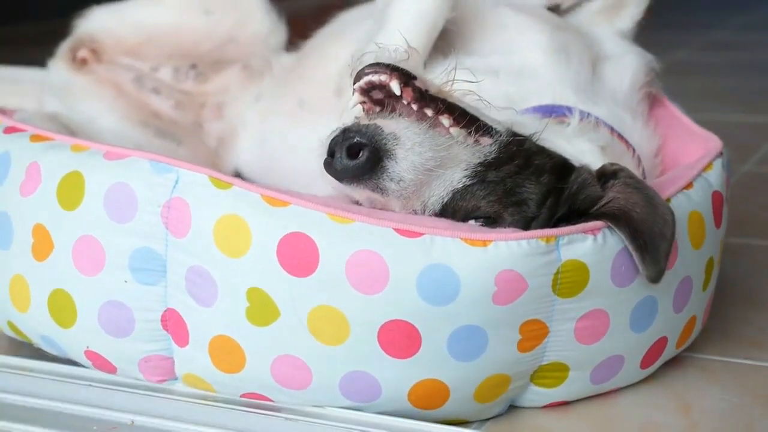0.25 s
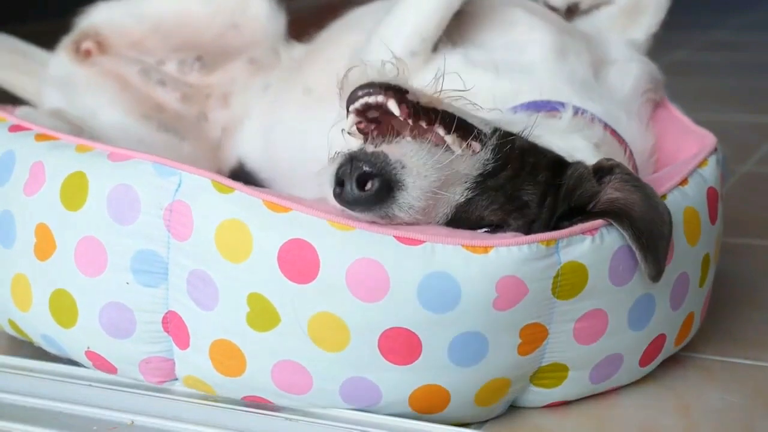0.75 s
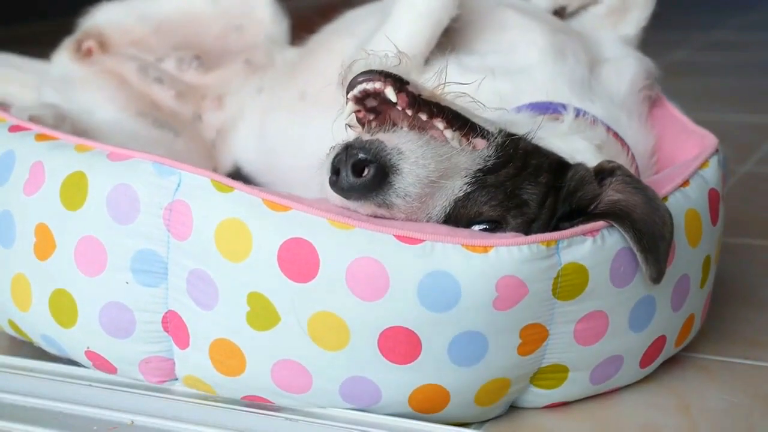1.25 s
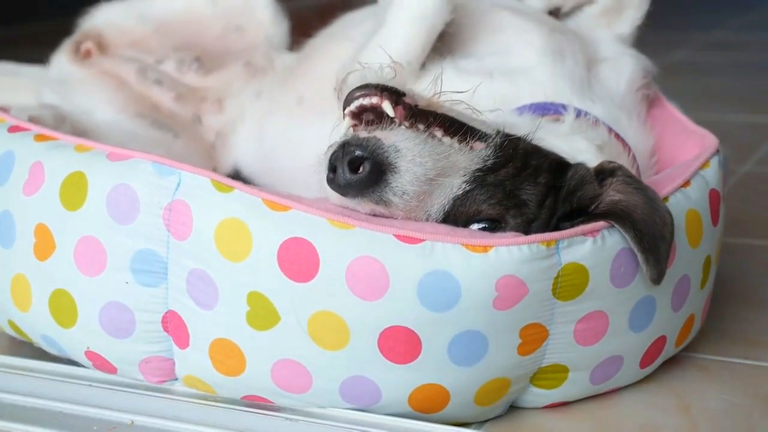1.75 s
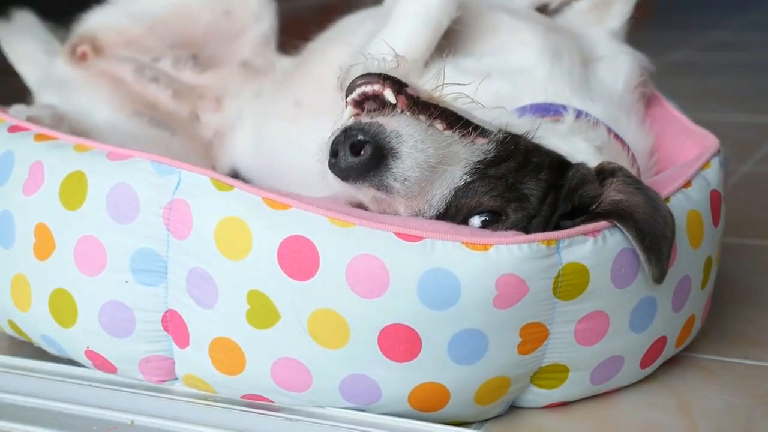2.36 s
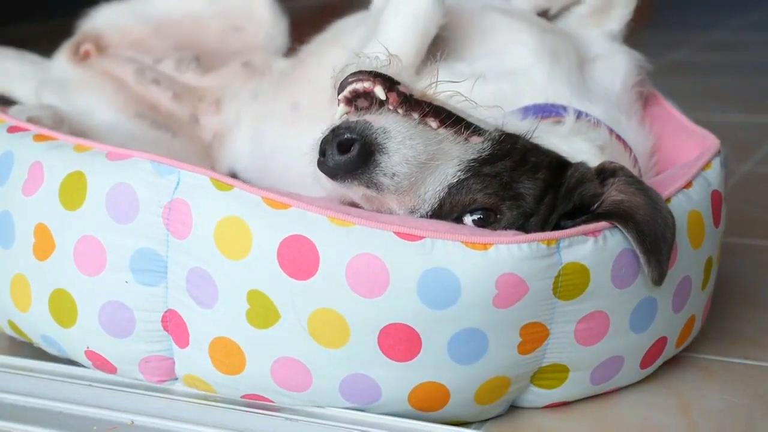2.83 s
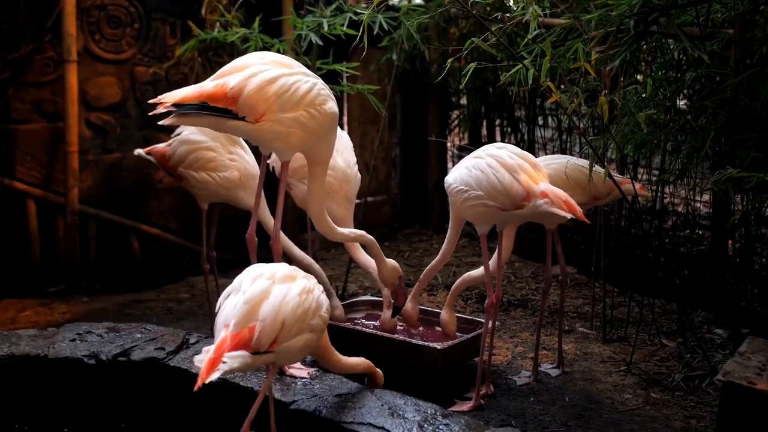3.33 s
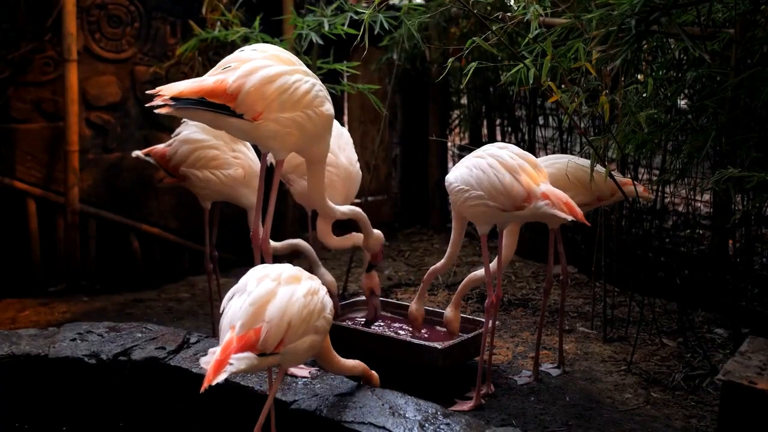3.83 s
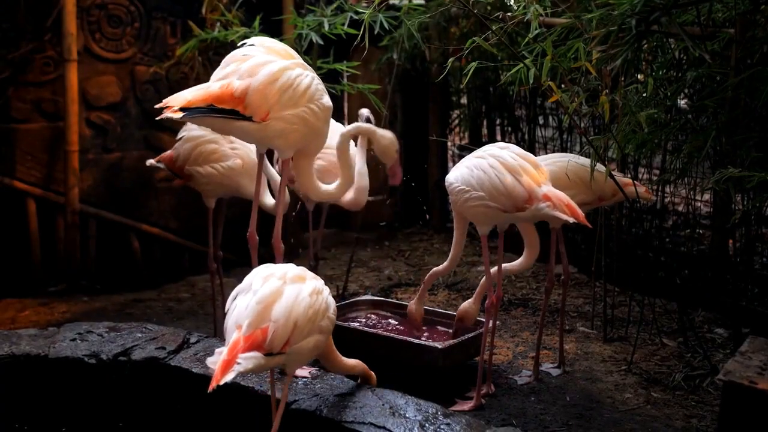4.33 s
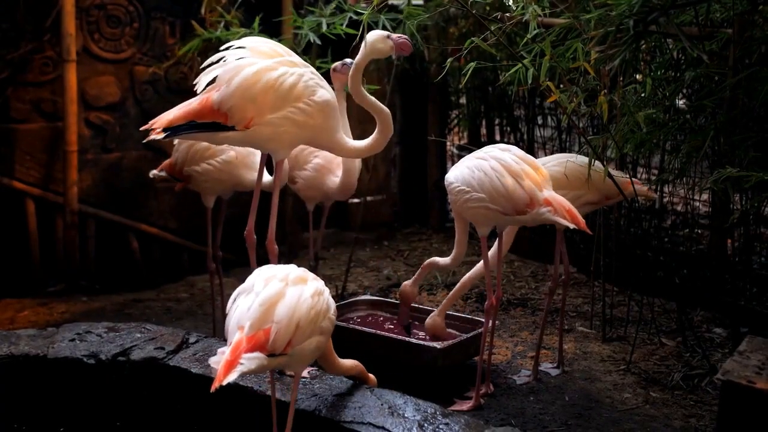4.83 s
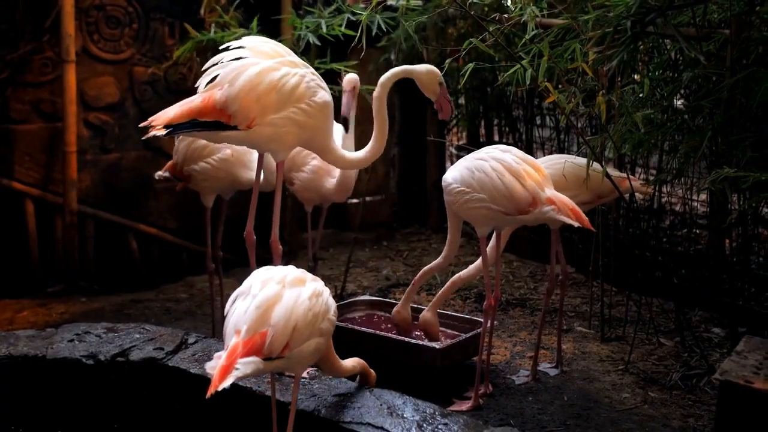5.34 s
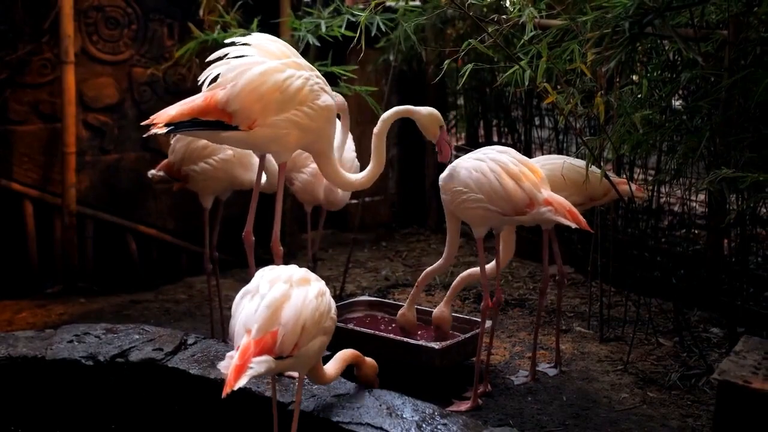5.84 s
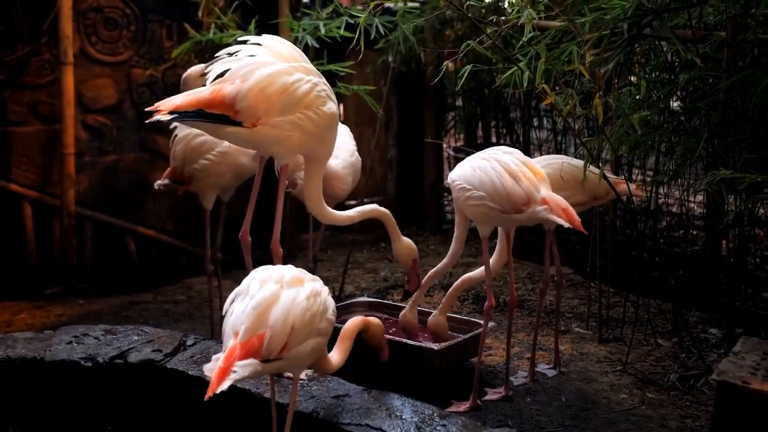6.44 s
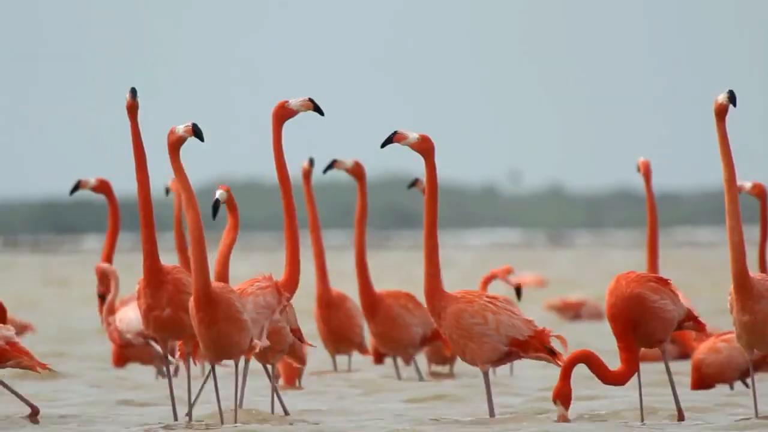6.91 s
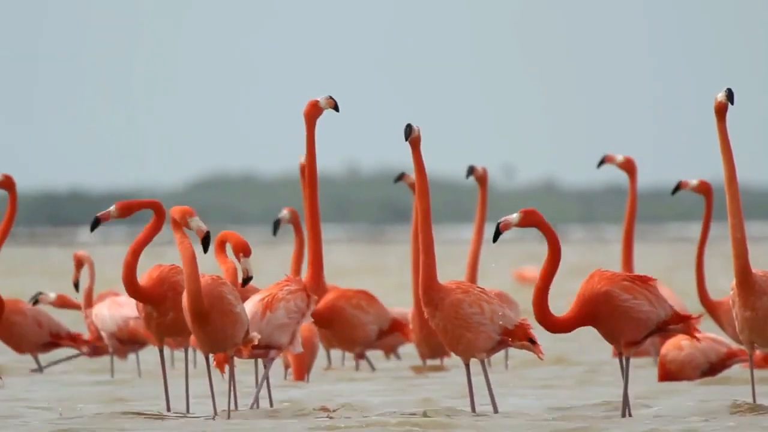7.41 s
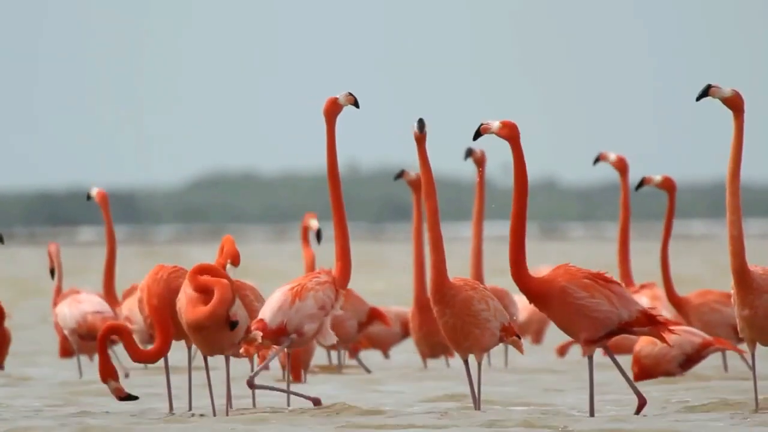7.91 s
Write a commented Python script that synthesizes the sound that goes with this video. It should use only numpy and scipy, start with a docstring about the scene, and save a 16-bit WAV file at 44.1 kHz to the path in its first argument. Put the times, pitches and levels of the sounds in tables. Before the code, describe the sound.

Close stereo pickup of three scenes in a row. First a dog indoors: one falling whine, a second that starts high and drops quickly, faint nose whistles, then three harsh barks with short room reflections. Next, flamingos at a feeding trough: fluttery nasal honks, pulsed grunts, dull knocks, broad background noise and a water slap. Finally open water, smooth wind, coarse rattling calls, a clear high note and soft honks.

```python
"""In a small room a dog whines twice, its voice catching now and then, and barks three times. The whines are
nearly pure tones, the barks unsteady harmonics with torn noise. Then, in an enclosure, flamingos honk (fluttering
harmonics), grunt (pulsed resonances) and knock their bills over a wash and far chatter of patchy noise, ending in
a short noise splash. Last, on an open lagoon, a flock rattles and honks, with one clear note, in a light breeze."""
import sys
import numpy as np
from scipy import signal
from scipy.fft import rfft, irfft, next_fast_len
from scipy.io import wavfile

SR = 44100
rng = np.random.default_rng(int(sys.argv[2]) if len(sys.argv) > 2 else 0)


def persist_wave(psi):
    """Save psi, clipped to +-1, as 16-bit WAV."""
    counts = np.round(np.clip(psi, -1, 1) * 32767).astype(np.int16)
    wavfile.write(sys.argv[1], SR, np.atleast_2d(counts).T)


N = 360297
T = np.arange(N) / SR
CUTOFF_HZ = 15900  # no harmonics above this


def from_db(db):
    """Decibels to gain."""
    return 10 ** (np.asarray(db) / 20)


def rms_one(x):
    """Scale to rms 1."""
    return x / np.sqrt(np.mean(x ** 2) + 1e-20)


def at_hz(points, hz):
    """Gain of a spectrum, joined on a log-frequency axis."""
    point_hz, db = np.transpose(points)
    return from_db(np.interp(np.log(np.maximum(hz, 1)), np.log(point_hz), db))


def span(start, end):
    """Sample times between two moments."""
    return np.arange(int(start * SR), int(end * SR)) / SR


def follow(rows):
    """Times, a 2.9 ms fade at each edge, and the columns of a curve."""
    s, *columns = np.transpose(rows)
    t = span(max(s[0], 0), s[-1])
    fade = np.clip(np.minimum(t - t[0], t[-1] - t) / 0.0029, 0, 1)
    return [t, fade] + [np.interp(t, s, column) for column in columns]


def add(out, t, x, pan_db=0):
    """Mix a sound in at its time and side; positive pan is to the left."""
    i = int(round(t[0] * SR))
    sides = from_db([[pan_db / 2], [-pan_db / 2]])
    out[:, i:i + len(t)] += (x * sides)[:, :N - i]


def white(t):
    """Fresh white noise for these times."""
    return np.random.default_rng(rng.integers(2 ** 31)).standard_normal(len(t))


def colour(x, spectrum):
    """Shape a sound by a spectrum; rms 1."""
    size = next_fast_len(len(x) + 1024)
    gains = at_hz(spectrum, np.fft.rfftfreq(size, 1 / SR))
    return rms_one(irfft(rfft(x, size) * gains, size)[:len(x)])


def wobble(t, hz):
    """Random unsteadiness up to a given rate; rms 1."""
    return rms_one(signal.sosfilt(signal.butter(2, hz, fs=SR, output="sos"), white(t)))


def turns(hz):
    """Running phase, in radians, of a frequency."""
    return 2 * np.pi * np.cumsum(hz) / SR


def shaky(t, hz, spread):
    """A sine whose pitch shakes at random, like an unsteady resonance; rms about 1."""
    return np.sqrt(2) * np.sin(turns(hz * (1 + spread * wobble(t, 450))))


def harmonics(pitch, throat, order=1, uneven_db=0):
    """Harmonics from a given order up, weighted by the throat, each wavering on its own; rms about 1."""
    k = np.arange(order, 26)[:, None]
    waver = np.array([wobble(pitch, 18) for _ in k])
    gains = at_hz(throat, k * pitch) * (k * pitch < CUTOFF_HZ) * from_db(uneven_db * waver)
    return np.sum(gains * np.sin(k * turns(pitch)), 0) / np.sqrt(np.sum(gains ** 2, 0) / 2)


def swell(t, rise, fall):
    """Rounded envelope; rise and fall are shares of the call."""
    u = np.linspace(0, 1, len(t))
    return np.sin(np.pi / 2 * np.clip(np.minimum(u / rise, (1 - u) / fall), 0, 1))


def mid_side(mid, side, width):
    """Left and right from a shared part and a part of opposite sign at each ear."""
    return mid + width * side * np.array([[1], [-1]])


def echoes(x, t60, wet_db, width, tone):
    """Dense reflections that die away by 60 dB in t60 seconds, partly different at each ear."""
    t = span(0, .6)
    decay = from_db(-60 * t / t60) * (t > .003)
    mid, side = [colour(white(t), tone) * decay for _ in range(2)]
    tail = mid_side(mid, side, width)
    tail /= np.sqrt(np.sum(tail ** 2) / 2)
    return x + from_db(wet_db) * signal.fftconvolve(x, tail, axes=1)[:, :N]


def rush(rows, spectrum, width, grain_db, split_hz=2500):
    """Grainy stereo noise whose low and high parts swell separately."""
    out = np.zeros((2, N))
    t, fade, low_db, high_db = follow(rows)
    grain = from_db(grain_db * wobble(t, 250))
    mid, side = [colour(white(t) * grain, spectrum) for _ in range(2)]
    noise = mid_side(mid, side, width)
    for kind, db in (("low", low_db), ("high", high_db)):
        band = signal.sosfilt(signal.butter(3, split_hz, kind, fs=SR, output="sos"), noise)
        add(out, t, fade * from_db(db) * rms_one(band))
    return out


# broad course of each whine, before its catches: time_s, pitch_hz, fundamental_db, overtones_db
WHINE_COURSES = [
    [(0,485,-20.5,-35.5),(.06,476,-22,-66),(.108,478,-18.5,-42),(.155,531,-8.5,-25.5),(.2,527.7,-11,-31),(.285,488,-11,-39.5),(.39,485.4,-16,-32),(.574,455,-28.5,-56),(.6,446,-46,-58)],
    [(.745,1104,-42,-64),(.762,1083,-29.5,-40.5),(.786,1065,-27,-42),(.792,1004,-32,-53),(.804,810,-14.5,-40),(.865,620,-14,-44),(1.1,607,-17.5,-53),(1.19,579,-21.5,-47.5),(1.4,521.6,-24,-50),(1.595,511,-28,-51),(1.64,497,-47,-71)],
]
# throat that weights the overtones of each whine: frequency_hz, relative_db
WHINE_THROATS = [
    [(950,13),(1550,-5),(2600,-21.5),(3200,-41.5),(8000,-52.5)],
    [(1200,7.5),(1800,-5),(2300,4.5),(3300,-27.5),(4600,-14),(11000,-38)],
]
# air through the nose: frequency_hz, relative_db (per Hz)
WHINE_AIR = [(100,-27),(900,4),(2300,-2.5),(3300,-14.5),(5400,-4.5),(8000,-17.5)]
# catches, where the throat tightens: time_s, pitch_lift_hz, fundamental_choke_db
CATCHES = [(.042,37,18),(.135,15.8,9),(0.238,8.2,15.5),(.332,27,9.5),(1.027,120,8.5),(1.285,57,-1.5),(1.471,54,-1)]
CATCH_RISE_S, CATCH_SETTLE_S, CHOKE_S = .022, .04, .025


def whines():
    """Nearly pure tones, overtones veiled by air; each catch lifts the pitch and most choke the tone."""
    out = np.zeros((2, N))
    air_levels_db = (-30, -9)  # relative to the overtones
    for rows, throat, air_db in zip(WHINE_COURSES, WHINE_THROATS, air_levels_db):
        t, fade, pitch, tone_db, over_db = follow(rows)
        for s, lift_hz, choke_db in CATCHES:
            settling = np.where(t < s, CATCH_RISE_S, CATCH_SETTLE_S)
            pitch = pitch + lift_hz * np.exp(-np.abs(t - s) / settling)
            tone_db = tone_db - choke_db * np.exp(-((t - s) / CHOKE_S) ** 2)
        pitch = pitch * (1 + 0.0066 * wobble(t, 70))
        tone = np.sqrt(2) * from_db(tone_db + 1.2 * wobble(t, 25)) * np.sin(turns(pitch))
        air = from_db(air_db) * colour(white(t), WHINE_AIR)
        overtones = harmonics(pitch, throat, order=2, uneven_db=3.5) + air
        add(out, t, fade * (tone + from_db(over_db) * overtones))
    return out


# room air: time_s, low_db, high_db
ROOM_AIR = [(0.0, -45.5, -72.5), (1.634, -50, -64.5), (1.87, -52, -69)]
# its colour: frequency_hz, relative_db (per Hz)
ROOM_AIR_COLOUR = [(30,-34),(100,-11),(190,0.5),(320,-6.5),(800,-8),(2000,-31),(6000,-26),(15000,-28.5)]


def room_air():
    """The quiet bed of the small room: noise, nearly the same at both ears."""
    return rush(ROOM_AIR, ROOM_AIR_COLOUR, width=0.15, grain_db=2.0)


# thin nasal whistles: start_s, end_s, mean_pitch_hz, level_db, glide_share, breathiness_share
NOSE_WHISTLES = [(0.043,0.137,4200,-51,0.2,.012),(0.741,0.798,5350,-37,-0.06,.008),(0.814,0.848,5000,-44.5,-0.14,.01),(1.03,1.125,5150,-56,-.08,.03),(1.37,1.6,4200,-65,-0.03,.004),(1.598,1.625,4240,-56,0,.02)]


def nose_whistles():
    """The nose whistles: a thin, slightly shaky sine gliding fast at first, then settling."""
    out = np.zeros((2, N))
    for start, end, hz, db, glide, breathy in NOSE_WHISTLES:
        t = span(start, end)
        bend = 1 / 4 - np.linspace(1, 0, len(t)) ** 3
        whistle = shaky(t, hz * (1 + glide * bend), breathy)
        add(out, t, from_db(db) * swell(t, 0.57, 0.3) * whistle)
    return out


# barks: start_s, length_s, full_effort_pitch_hz, voice_db, rasp_db, voice_break_s,
# mouth_ring_from_hz, mouth_ring_to_hz, ring_db
BARKS = [(1.983,.13,631.6,-12,-14,2.032,1900,2395,-23.5),(2.359,0.13,643,-11.5,-14,2.428,1755,2850,-20.5),(2.596,.142,615,-11,-14,2.703,1900,1500,-23)]
# throat that weights the voice: frequency_hz, relative_db
BARK_VOICE = [(300,-11.5),(500,-2),(680,11),(1150,-17.5),(1800,-9.5),(2600,-19.5),(4000,-55.5)]
# throat that shapes the rasp: frequency_hz, relative_db
BARK_RASP = [(600,-39.5),(880,-14.5),(1140,3),(1550,-17),(1750,-7),(2200,-15.5),(2750,-11.5),(3500,-25.5),(4600,-33),(6600,-30),(8500,-33),(14000,-58)]
# noise from the chest: frequency_hz, relative_db (per Hz)
BARK_CHEST = [(30,-28.5),(100,-19),(380,-23),(500,2.5),(800,6),(1100,-18.5),(2000,-55)]
BARK_LEAD_S, BARK_LEAD_DB = .02, 13  # the voice creeps in to this far below full effort
BARK_ATTACK_S, BARK_ATTACK_DB = .013, 30  # then bursts open; the dB is the whole climb
BARK_RELEASE_S, BARK_RELEASE_DB = .026, 20
BARK_SLACK_PER_DB = 0.02  # share of pitch lost per dB below full effort
BARK_SAG_HZ_PER_S = 453
JAW_DB = 10.5  # the rasp and ring are this much weaker at both ends than with the jaw wide open
BARK_BREAK_S, BARK_BREAK_DB = .0045, 5  # the voice gives way for a moment
RING_SPREAD = .04  # unsteadiness of the mouth ring and the whistle past the teeth
TEETH_HZ, TEETH_DB = 6200, -38
TEAR_HZ, TEAR_DEPTH = 130, .55  # the rasp tears in uneven pulses
BARK_LAG_S = .00016  # the barks reach the left microphone first


def barks():
    """Chaotic folds: pitch follows effort, turbulence passes each cycle, and a mouth ring glides."""
    out = np.zeros((2, N))
    for start, length, top_hz, voice_db, rasp_db, break_s, from_hz, to_hz, ring_db in BARKS:
        end = start + length
        burst = start + BARK_LEAD_S
        t, fade, effort_db = follow([
            (start, -BARK_ATTACK_DB), (burst, -BARK_LEAD_DB), (burst + BARK_ATTACK_S, 0),
            (end - BARK_RELEASE_S, 0), (end, -BARK_RELEASE_DB)])
        effort_db = effort_db + 0.7 * wobble(t, 45)
        jaw_db = -JAW_DB * np.linspace(-1, 1, len(t)) ** 2
        jaw_db = jaw_db + np.minimum(effort_db + BARK_LEAD_DB, 0) / 2

        pitch = top_hz * np.exp(BARK_SLACK_PER_DB * effort_db) - BARK_SAG_HZ_PER_S * (t - t.mean())
        pitch = pitch * (1 + 0.055 * wobble(t, 200))
        voice = harmonics(pitch, BARK_VOICE, uneven_db=4) * (1 + 0.12 * wobble(t, 130))
        voice = voice + .5 * colour(white(t), BARK_CHEST)
        voice *= from_db(-BARK_BREAK_DB * np.exp(-((t - break_s) / BARK_BREAK_S) ** 2))

        bursts = (1 + .8 * np.cos(turns(pitch))) * from_db(2.5 * wobble(t, 150))
        turbulence = colour(white(t) * bursts, BARK_RASP)
        # when pushed, the folds slip to half their rate
        growl = harmonics(pitch / 2, BARK_RASP, order=3, uneven_db=12.0)
        rasp = rms_one(turbulence + 0.61 * growl * from_db(effort_db / 2))
        tearing = 1 + TEAR_DEPTH * shaky(t, TEAR_HZ, .3) / np.sqrt(2)
        rasp = rms_one(rasp * tearing)

        ring_hz = np.linspace(from_hz, to_hz, len(t))
        ring = from_db(ring_db + 3.75 * wobble(t, 60)) * shaky(t, ring_hz, RING_SPREAD)
        teeth_hz = TEETH_HZ * (1 + .06 * wobble(t, 30))
        ring += from_db(TEETH_DB + 4.6 * wobble(t, 60)) * shaky(t, teeth_hz, RING_SPREAD)
        mouth = from_db(jaw_db) * (from_db(rasp_db) * rasp + ring)
        add(out, t, fade * from_db(effort_db) * (from_db(voice_db) * voice + mouth))
    tone = [(100, -11), (500, -3.0), (2800, 1.0), (8000, 0.5)]
    left, right = echoes(out, t60=0.19, wet_db=-3.5, width=1.0, tone=tone)
    return np.array([left, np.interp(T - BARK_LAG_S, T, right)])


def crowd(x, patchy_db, count=9):
    """Many far voices overlap: each stretch of the middle range swells and sinks on its own."""
    size = next_fast_len(N)
    centres, hz = np.log(np.geomspace(400, 6000, count)), np.fft.rfftfreq(size, 1 / SR)
    spectrum, out = rfft(x, size), 0
    for own in np.eye(count):
        band = irfft(spectrum * np.interp(np.log(hz + 1), centres, own), size)[:, :N]
        is_middle = 1 - own[0] - own[-1]  # the lowest and highest stretches stay steady
        out = out + band * from_db(patchy_db * wobble(T, 14) * is_middle)
    return out


# wash of the enclosure, before its panning and patchiness: time_s, low_db, high_db
WASH = [(3.215,-37.5,-42.5),(3.78,-38.5,-40.5),(3.82,-33,-35),(4.3,-29,-33),(4.4,-32,-37),(4.75,-36,-37),(5.05,-30.5,-33.5),(5.35,-40,-46.5),(6.28,-42.5,-48),(6.5,-36.5,-41.5),(6.95,-34,-40.5)]
# its colour: frequency_hz, relative_db (per Hz)
WASH_COLOUR = [(25,-30),(59,-5),(117,-14.5),(290,0),(1610,0.5),(5880,-21.5),(11000,-23.5),(16000,-34.5)]
# its drift between the sides: time_s, left_minus_right_db
WASH_PAN = [(3.8,-4.5),(4.25,-1.5),(4.6,-1),(5.2,4)]


def enclosure_wash():
    """Wash and far chatter: broad noise drifting from right to left, patchy in the middle range."""
    side_db = np.interp(T, *np.transpose(WASH_PAN))
    wash = rush(WASH, WASH_COLOUR, width=0.42, grain_db=2.0)
    return crowd(wash * from_db([side_db / 2, -side_db / 2]), patchy_db=3.0)


# honks: start_s, length_s, level_db, rasp (0-1), kind (0-3)
HONKS = [(3.216,.08,-21,0.5,0),(3.303,0.11,-22.5,0.58,1),(4.372,0.078,-23.5,0.22,0),(4.475,0.095,-21.5,0.48,1),
         (5.313,0.077,-26.5,0.45,2),(5.541,0.08,-28.5,0.4,2),(5.583,0.082,-22,0.2,0),(5.672,0.115,-19,0.55,1),(5.786,0.098,-30,0,2),
         (6.06,0.094,-24.5,0.2,2),(6.34,0.1,-26.5,0.13,2),(6.633,0.1,-25.5,0.15,2),(7.723,0.062,-26.5,0.2,3),(7.828,0.13,-20.5,0.1,3)]
# kinds (loud bird's high note, its low note, soft bird, lagoon bird):
# top_pitch_hz, final_drop_share, pan_db (positive left), throat (rounded to 0-3)
HONK_KINDS = [(924,0.125,4,0.5),(730,0.09,3.5,3),(814.6,0.0465,-3,1),(622,0.055,-4,2)]
# throats (loud bird's high note, soft bird, lagoon bird, loud bird's low note): frequency_hz, relative_db
HONK_THROATS = [
    [(400,-43),(900,5),(1850,-3),(2770,-10.5),(6450,-14.5),(8800,-22),(10500,-19),(15000,-30)],
    [(810,3.5),(1620,-3.5),(2430,3.5),(4060,-13),(5600,-12),(6500,-25),(8900,-9),(9800,-16),(14000,-17)],
    [(300,-3),(620,1.5),(1230,10),(2450,-8),(3050,-4.5),(4400,-14.5),(12000,-35)],
    [(400,-35),(730,1.5),(2150,-1.5),(2900,-9),(5100,-13),(5900,-21),(10500,-18),(15000,-29)],
]
BILL_HZ, BILL_SHUT_DB = 3500, 11  # treble is weaker at both ends of a honk, with the bill half shut


def honks():
    """Pitch arches and drops; the syrinx flutters, loosest at both ends, with hoarse air on every cycle."""
    out = np.zeros((2, N))
    for start, length, db, rasp, kind in HONKS:
        top_hz, drop, pan_db, bird = HONK_KINDS[int(round(kind))]
        t, throat = span(start, start + length), HONK_THROATS[int(round(bird))]
        away = np.linspace(-1, 1, len(t))  # 0 at the middle of the call
        loose = np.clip(rasp * (.55 + 1.2 * away ** 2), 0, 1)
        arch = 1 - 0.031 * away ** 2 - drop * np.maximum(away, 0) ** 2
        pitch = top_hz * (arch + .03 * loose * wobble(t, 500))
        flutter = 1 + .7 * loose * np.cos(turns(140 * (1 + 0.16 * wobble(t, 37))))

        air_colour = [(100, -40), (700, -12)] + [p for p in throat if p[0] > top_hz * 1.5]
        air = colour(white(t) * (1 + np.cos(turns(pitch))), air_colour)
        voice = harmonics(pitch, throat, uneven_db=2.5) + air * (.12 + 1.5 * loose)
        dull = signal.sosfilt(signal.butter(1, BILL_HZ, fs=SR, output="sos"), voice)
        voice = dull + (voice - dull) * from_db(-BILL_SHUT_DB * away ** 2)
        add(out, t, from_db(db) * rms_one(voice * flutter) * swell(t, 0.43, 0.39), pan_db)
    return out


# hiss let out by grunts, also used for the knocks: frequency_hz, relative_db (per Hz)
GRUNT_HISS = [(200,-18),(800,5),(3000,3),(5000,-6),(9000,-17.5),(15000,-30)]
PULSE_RISE_S = .0015
GRUNT_QUICKEN, GRUNT_BLUR = .22, .7  # share of rate gained; how far the gaps fill by the end
GRUNT_SAG, GRUNT_GROW_DB = 0.1194, 1.5  # share by which the resonances sink; crescendo


def grunt(t, per_s, first_hz, second_hz, second_db, hiss_db, spread):
    """Pulses, quickening and blurring, ring two sinking throat resonances and let out hiss."""
    progress = np.linspace(0, 1, len(t))
    rate = per_s * (1 + GRUNT_QUICKEN * (progress - .5) + 0.038 * wobble(t, 60))
    cycle_share = turns(rate) / (2 * np.pi) % 1
    age = cycle_share / rate / PULSE_RISE_S  # 1 at the peak of a pulse
    pulses = age ** 2 * np.exp(2 * (1 - age)) * from_db(1.5 * wobble(t, 120))
    pulses = pulses + GRUNT_BLUR * progress ** 2
    sag = 1 - GRUNT_SAG * (progress - .5)
    first = shaky(t, first_hz * sag, spread)
    second = from_db(second_db + 3 * wobble(t, 400)) * shaky(t, second_hz * sag, spread)
    # the hiss lingers between pulses
    hiss = from_db(hiss_db) * colour(white(t), GRUNT_HISS) * np.sqrt(pulses)
    call = (first + second) * pulses + hiss
    return rms_one(call * from_db(GRUNT_GROW_DB * progress)) * swell(t, 0.0085, 0.3)


# grunts: start_s, length_s, level_db, kind (0-7)
GRUNTS = [(3.375,.045,-25,0),(3.516,0.12,-32,5),(3.803,0.14,-34,6),(4.21,.07,-32,0),(4.284,0.058,-32.5,2),(4.534,0.062,-26,0),(4.641,0.051,-31,0),
          (4.875,.09,-34.5,1),(4.98,0.074,-35,0),(5.304,0.12,-29,1),(5.589,0.018,-27.5,0),(5.735,.062,-22,0),
          (6.045,0.078,-28.5,1),(6.329,0.028,-33.5,6),(6.411,0.13,-32.5,7),(6.683,0.063,-30.5,7),(6.754,0.07,-33.5,7),
          (7.149,0.061,-28.5,3),(7.267,0.13,-20.5,3),(7.398,0.063,-25.5,3),(7.467,0.085,-19.5,3),(7.718,0.025,-21.5,5),(7.786,0.078,-22,4),(7.925,.11,-20,4),(8.041,0.064,-32.5,4),(8.105,0.088,-22.5,4)]
# kinds (deep, nasal, hissing, two lagoon rattles, a cluck, a squeak, a rasp): pulses_per_s,
# first_resonance_hz, second_resonance_hz, second_db, hiss_db, shake_share, pan_db (positive left)
GRUNT_KINDS = [(114.8,1450,3500,-10,-6.5,0.112,1),(113.6,1620,3210,-7,-4,0.1015,-2),(129,4270,4400,-3,-6,0.041,2),(112.3,1150,2880,-5,-7,.09,2.5),(103.3,1080,2330,-6,-9,.08,2.5),(150.3,900,1900,-12,-11.5,.17,-1.5),
               (110.1,2550,3100,-4,-4,0.061,-2),(95.5,1700,4300,-8.5,-4,0.124,-5)]


def grunts():
    """The near birds grunt and rattle, each kind with its own throat and place."""
    out = np.zeros((2, N))
    for start, length, db, kind in GRUNTS:
        *throat, pan_db = GRUNT_KINDS[int(round(kind))]
        t = span(start, start + length)
        add(out, t, from_db(db) * grunt(t, *throat), pan_db)
    return out


# bills knock on the feeding trough: start_s, level_db (before a 4 dB lift), pitch_hz, pan_db (positive left)
KNOCKS = [(4.769,-35,910,2),(5.007,-25,1254,2.5),(5.235,-34.5,1203,7),(6.602,-33,1045,-2)]
KNOCK_T60_S = 0.043


def knocks():
    """Short, dull taps of a bill on the wet trough: a shaky ring and noise die away together."""
    out = np.zeros((2, N))
    for start, db, hz, pan_db in KNOCKS:
        t = span(start, start + KNOCK_T60_S)
        ring = shaky(t, hz, .12) + .4 * colour(white(t), GRUNT_HISS)
        add(out, t, from_db(db + 4 - 60 * (t - start) / KNOCK_T60_S) * ring, pan_db)
    return out


# colour of the splash: frequency_hz, relative_db (per Hz)
SPLASH_COLOUR = [(30,-49),(70,-9),(300,-3),(2100,-16),(3500,-9),(5000,-20.5),(16000,-39)]
SPLASH_START_S, SPLASH_HOLD_S, SPLASH_DECAY_S = 6.824, 0.016, 0.1066
SPLASH_BODY_DB, SPLASH_SPRAY_DB, SPLASH_FALL_DB = -20.5, -26, 17


def splash():
    """A slap on water: body and spray start at once, hold briefly and die away together."""
    times = SPLASH_START_S + np.cumsum([0, SPLASH_HOLD_S, SPLASH_DECAY_S])
    below_db = np.array([0, 0, SPLASH_FALL_DB])
    rows = list(zip(times, SPLASH_BODY_DB - below_db, SPLASH_SPRAY_DB - below_db))
    return rush(rows, SPLASH_COLOUR, width=0.33, grain_db=0.0)


# breeze over the lagoon: time_s, low_db, high_db
BREEZE = [(6.955,-41.5,-49.5),(7.35,-29,-34.5),(7.68,-33,-39),(8.17,-29.5,-36.5)]
# its colour: frequency_hz, relative_db (per Hz)
BREEZE_COLOUR = [(25,-15),(70,-4),(250,-1),(1100,2.5),(1900,-4),(3100,-6.5),(5000,-18),(15000,-36)]


def breeze():
    """Light wind in the open: wide, smooth noise that swells and sinks."""
    return rush(BREEZE, BREEZE_COLOUR, width=0.51, grain_db=0.4)


NOTE_START_S, NOTE_HOLD_S, NOTE_RELEASE_S, NOTE_TAIL_S = 7.532, 0.079, 0.042, 0.1
NOTE_HZ, NOTE_DB, NOTE_TAIL_DB = 1312, -19.5, -39


def clear_note():
    """One steady, high piping call on the lagoon, nearly a sine, which sinks to a faint tail."""
    out = np.zeros((2, N))
    times = NOTE_START_S + np.cumsum([0, NOTE_HOLD_S, NOTE_RELEASE_S, NOTE_TAIL_S])
    t, fade, db = follow(list(zip(times, (NOTE_DB, NOTE_DB, NOTE_TAIL_DB, NOTE_TAIL_DB))))
    pitch = NOTE_HZ * (1 + 0.0048 * wobble(t, 120))
    voice = harmonics(pitch, [(1320, 7.5), (2630, -7.0), (4000, -20), (12000, -39)])
    add(out, t, fade * from_db(db) * voice)
    return out


def scene():
    """Dog, enclosure and lagoon, one after another; only the enclosure has walls around the birds."""
    whining = echoes(whines() + nose_whistles(), t60=.15, wet_db=-20, width=.4, tone=[(500, 0), (8000, -6)])
    dog = whining + room_air() + barks()
    calls = honks() + grunts() + knocks() + clear_note()
    enclosed = T < BREEZE[0][0]
    walls_tone = [(300, 21.6), (1500, 8.5), (14000, 7.4)]
    enclosure = echoes(calls * enclosed, t60=0.078, wet_db=-5.0, width=0.4, tone=walls_tone)
    lagoon = calls * ~enclosed + breeze()
    return dog + enclosure_wash() + enclosure + splash() + lagoon


def record(dry):
    """The loudest peaks are rounded and the top is cut."""
    rounded = 1.5 * np.tanh(dry / 1.5)
    return signal.sosfilt(signal.cheby2(16, 70, CUTOFF_HZ + 500, fs=SR, output="sos"), rounded)


dry = scene()
out = record(dry)
persist_wave(out)
```